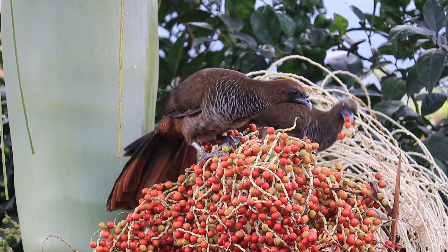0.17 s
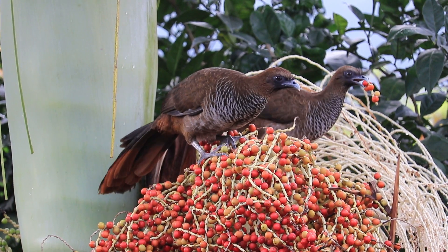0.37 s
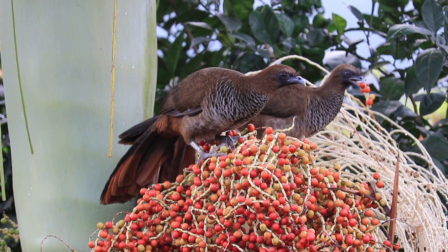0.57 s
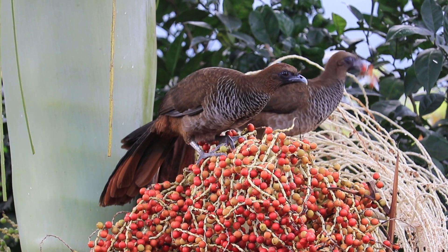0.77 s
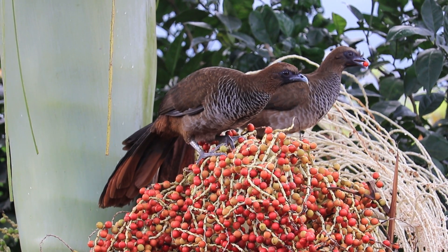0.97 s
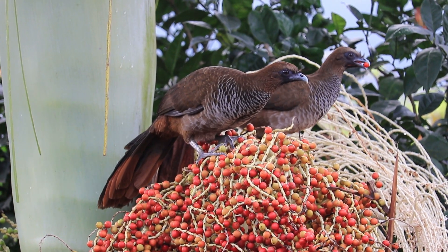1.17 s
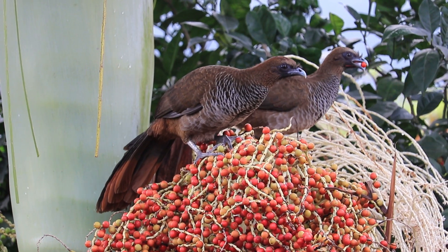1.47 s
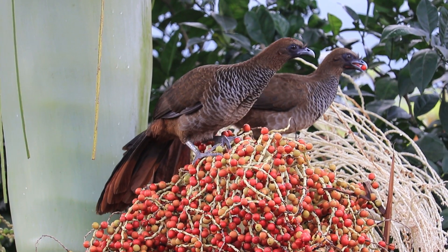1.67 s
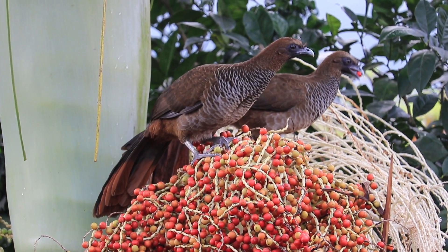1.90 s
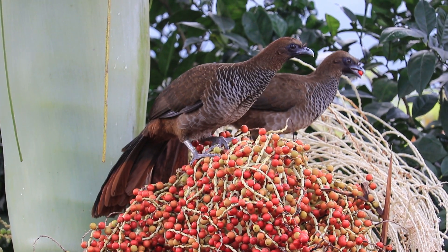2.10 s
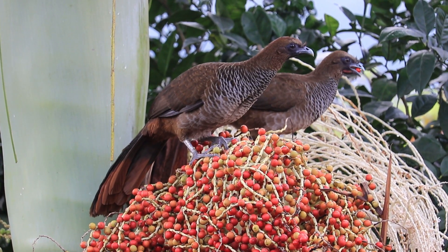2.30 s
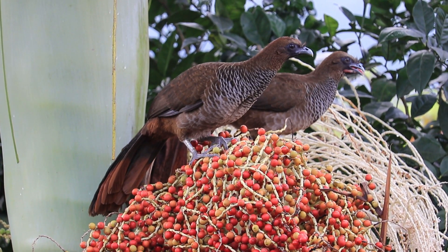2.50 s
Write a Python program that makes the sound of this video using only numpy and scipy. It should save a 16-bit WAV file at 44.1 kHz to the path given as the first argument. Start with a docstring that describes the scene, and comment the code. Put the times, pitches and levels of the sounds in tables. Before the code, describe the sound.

Two wild fowl squabble outdoors with harsh falling squeals and long whines, small birds peeping.

```python
"""A short peep, then the harsh falling squeal of a chachalaca squabbling on a palm's fruit cluster.
It squeals three times, twice breaking into a hoarse rasp; a rival answers with two long, clean whines.
Both voices are harmonic sources filtered by the throat, and turn rough where the pitch slips fast.
Small birds peep and twitter in gliding pure tones, the fruit stalks rustle in bursts of noise,
and the trees scatter an echo over a low outdoor rumble."""
import sys
import numpy as np
from scipy import signal
from scipy.fft import rfft, irfft, next_fast_len
from scipy.io import wavfile
from scipy.ndimage import map_coordinates

SR = 44100
rng = np.random.default_rng(int(sys.argv[2]) if len(sys.argv) > 2 else 0)


def bounce(signal):
    """Save signal as a 16-bit WAV file at the path given by the first command-line argument."""
    frames = np.transpose(np.atleast_2d(signal))
    limited = np.clip(frames, -1, 1)
    pcm = np.round(limited * 32767).astype(np.int16)
    wavfile.write(sys.argv[1], SR, pcm)


N = 116865

# Contour of each squeal: time_s, pitch_hz, level_db, overtone_gain_db
SQUEAL_CONTOURS = [
    [(.16, 1587, -47.5, -24), (.18, 2230, -27, -5.5), (.205, 2297, -29, 1.5), (.255, 2201, -23.5, -8),
     (.33, 2080, -29.5, 4), (.41, 1983, -24, -9.5), (.432, 1897, -31, -8), (.445, 1669, -23.5, -18),
     (.55, 1533, -46, -7)],
    [(.926, 1724, -34.5, -21), (.94, 2191, -26.5, -10.5), (.962, 2282, -33, 1.5), (.989, 2249, -37.5, 4),
     (.998, 2219, -18.5, -10), (1.04, 2135, -25.5, -2.5), (1.1, 2030, -25.5, -5), (1.145, 2005, -34, -11)],
    [(2.16, 1631, -38, -39), (2.185, 2190, -31, -5.5), (2.222, 2255, -37, 5.5), (2.25, 2219, -25, -3),
     (2.29, 2074, -32, 0.5), (2.335, 2030, -40.5, -2)],
]
# Overtones of a squeal: pitch_multiple, relative_db
SQUEAL_OVERTONES = [(2, -17), (3, 1.5), (3.5, -18), (4, 2.5), (5, -10)]
# Envelope of each hoarse tail: time_s, level_db
TAIL_ENVELOPES = [
    [(1.09, -42), (1.11, -28.5), (1.23, -33), (1.53, -39), (1.65, -49)],
    [(2.285, -48), (2.30, -24.5), (2.35, -33), (2.47, -33.5), (2.65, -36.5)],
]
# Noise spectrum of the tails: frequency_hz, relative_db
TAIL_SPECTRUM = [(1000, -15), (1330, -10.5), (1490, 1.5), (1850, 7.5), (2050, -7.5), (2350, -8.5),
                 (3500, -57), (5200, -39), (6200, -12), (8400, -21), (9500, -34)]
# Contour of each whine: time_s, pitch_hz, level_db, octave_gain_db
WHINE_CONTOURS = [
    [(.245, 1580, -39, -18), (.275, 1790, -22, -42), (.308, 1843, -14.5, -41), (.36, 1755, -24, -27),
     (.44, 1755, -23, -21.5), (.58, 1863, -20, -26.5), (.66, 1888, -26.5, -5.5), (.782, 1882, -25.5, -9.5),
     (.802, 1550, -45, 1)],
    [(1.645, 1574, -30.5, -15), (1.683, 1780, -25, -25), (1.71, 1794, -17, -34), (1.775, 1680, -35.5, -6),
     (1.815, 1693, -29.5, -23), (1.915, 1708, -37, -4), (2.0, 1746, -24, -18), (2.022, 1745, -39, -14),
     (2.04, 1766, -25, -12), (2.13, 1804, -23.5, -10.5), (2.203, 1836, -24, -10), (2.225, 1470, -44, 5.5)],
]
# Harmonics of a whine above the octave: pitch_multiple, relative_db
WHINE_HARMONICS = [(3, -17), (4, -18.5), (5, -20.5)]
# Small birds' slurred notes: start_s, length_s, first_hz, middle_hz, last_hz, level_db
PEEP_NOTES = [(.06, .09, 2580, 2480, 2130, -28), (2.125, .07, 2220, 2310, 2330, -37),
              (1.31, .11, 9350, 10100, 10500, -46), (1.75, .1, 9100, 10050, 10500, -45),
              (1.695, .042, 6400, 7200, 8200, -39), (1.782, .034, 3400, 4450, 5700, -29),
              (1.815, .015, 4400, 4200, 3750, -28), (.36, .21, 970, 880, 770, -45),
              (1.94, .26, 900, 865, 620, -45), (.735, .075, 1230, 1160, 1060, -44)]
# Flurries of squeaks: centre_s, spread_s, level_db
FLURRIES = [(1.68, .025, -45), (1.82, .022, -41)]
# Tiny, high, falling chips: start_s, level_db
HIGH_CHIPS = [(0.337, -38), (.718, -41), (1.85, -46)]
# Rustles of the fruit stalks: centre_s, width_s, level_db, centre_hz
STALK_RUSTLES = [(0.308, 0.031, -33.5, 1630), (0.553, 0.026, -36, 1980), (.78, 0.012, -37.5, 1824),
                 (1.36, 0.019, -40.5, 1696), (1.586, 0.014, -36, 1670), (1.831, 0.054, -34, 4040),
                 (2.37, 0.02, -36.5, 1770)]
# Reverberation time among the trees: frequency_hz, t60_s
TREE_DECAY = [(2000, 0.41), (6000, 0.46), (12000, 0.11)]
# Spectral density of rumble and leaf hiss: frequency_hz, relative_db
AIR_SPECTRUM = [(20, -7.5), (60, -0.5), (120, 0.5), (250, -7.5), (2000, -11), (4200, -14.5), (6200, -13),
                (8500, -14), (10000, -21), (15500, -24.5)]
# Likeness of that noise at left and right: frequency_hz, correlation
AIR_CORRELATION = [(90, .96), (400, .66), (12000, .72)]


def squeals(flutter_hz=380, shimmer_db=2.0, rasp_db=-27.5):
    """Amplitude modulation: a strained voice scoops up and sags, each overtone fluttering on its own."""
    out = np.zeros(N)
    for rows in SQUEAL_CONTOURS:
        gate, hz, db, overtone_db = contours(rows)
        phase = voice_phase(hz, jitter=.004, jitter_hz=flutter_hz)
        overtones = sum(amp(level + shimmer_db * wobble(flutter_hz)) * partial(phase, multiple, rasp_db)
                        for multiple, level in SQUEAL_OVERTONES)
        fundamental = partial(phase, 0.99, rasp_db)  # slightly flat
        out += gate * amp(db) * (fundamental + amp(overtone_db) * overtones)
    return throat(out)


def hoarse_tails(tone_hz=1534, jitter=0.0126, tone_db=-6, flutter_db=2.3):
    """Aperiodic voicing: a squeal breaks into fluttering band noise, a wavering tone at its low edge."""
    envelope = sum(gate * amp(db) for gate, db in map(contours, TAIL_ENVELOPES))
    tone = np.sqrt(2) * np.sin(phase_of(tone_hz * (1 + jitter * wobble(90))))
    flutter = unit_rms(amp(flutter_db * wobble(130)))
    rasp = noise(lambda hz: log_interp(TAIL_SPECTRUM, hz))
    return envelope * flutter * (rasp + amp(tone_db) * tone)


def whines(scratch_s=.17, scratch_db=6, wander_db=2.5, shimmer_db=1.5, rasp_db=-34):
    """Harmonic balance sets timbre: a rough onset clears to a near-pure tone that grows reedier."""
    out, t = np.zeros(N), np.arange(N) / SR
    for rows in WHINE_CONTOURS:
        gate, hz, db, octave_db = contours(rows)
        onset = np.exp(-((t - rows[0][0]) / scratch_s) ** 2)
        phase = voice_phase(hz, jitter=0.0019 + .012 * onset, jitter_hz=150)
        upper = np.zeros(N)
        for multiple, level in WHINE_HARMONICS:
            flicker_db = wander_db * wobble(24.68) + onset * scratch_db * wobble(130)
            upper += amp(level + flicker_db) * partial(phase, multiple, rasp_db)
        voice = partial(phase, 1, rasp_db) + amp(octave_db) * partial(phase, 2, rasp_db)
        voice += amp(.55 * (octave_db + 13)) * upper  # upper harmonics partly follow the octave
        out += gate * amp(db + shimmer_db * wobble(60)) * voice
    return throat(out)


def voice_phase(hz, jitter, jitter_hz, break_jitter=0.034, break_hz_per_s=7850):
    """Frequency modulation: a voice jitters, and turns rough wherever its pitch slips fast."""
    slip = np.clip(np.abs(np.gradient(hz)) * SR / break_hz_per_s, 0, 1) ** 2
    return phase_of(hz * (1 + jitter * wobble(jitter_hz) + break_jitter * slip * wobble(700)))


def partial(phase, multiple, rasp_db, rasp_hz=1300):
    """Sidebands: turbulence spreads a skirt of noise around one sinusoid."""
    sine, cosine = np.sin(multiple * phase), np.cos(multiple * phase)
    skirt = wobble(rasp_hz) * sine + wobble(rasp_hz) * cosine
    return np.sqrt(2) * (sine + amp(rasp_db) * skirt)


def throat(x, valley_hz=5050, width_hz=430, valley_db=-12, top_hz=9120):
    """Source and filter: the throat's response dips between resonances and drops above the top one."""
    valley = lambda hz: amp(valley_db * np.exp(-((hz - valley_hz) / width_hz) ** 2))
    shelf = lambda hz: 0.32 + 0.88 / (1 + (hz / top_hz) ** 48)
    return filtered(x, lambda hz: valley(hz) * shelf(hz))


def small_birds(chip_s=.014, chip_glide_hz=(15800, 13150, 10500)):
    """Superposition of pure-tone glides: single peeps, flurries and chips."""
    chips = sum(whistle(s, chip_s, chip_glide_hz, db) for s, db in HIGH_CHIPS)
    peeps = sum(whistle(s, length_s, glide_hz, db) for s, length_s, *glide_hz, db in PEEP_NOTES)
    return peeps + sum(twitter(*row) for row in FLURRIES) + chips


def twitter(centre_s, spread_s, db, pitch_hz=4700, spread_octaves=.38, squeak_s=.022):
    """Gaussian scatter: twelve squeaks of random time, pitch and slant make a flurry."""
    out = np.zeros(N)
    for when, pitch, slant in rng.standard_normal((12, 3)):
        hz = pitch_hz * 2 ** (spread_octaves * pitch)
        bend = np.exp(.13 * slant)
        out += whistle(centre_s + spread_s * when, squeak_s, (hz / bend, hz, hz * bend), db)
    return out


def whistle(start_s, length_s, glide_hz, db, jitter=.008):
    """Frequency sweep: a small bird's note swells and fades on a parabola through three pitches."""
    t = np.arange(int(length_s * SR)) / SR
    hz = np.polyval(np.polyfit([0, .5, 1], glide_hz, 2), t / length_s)
    hz *= 1 + jitter * np.interp(t * 400, np.arange(256), rng.standard_normal(256))
    envelope = amp(db) * np.sin(np.pi * t / length_s) ** 2
    tone = np.sqrt(2) * np.sin(phase_of(hz))
    return np.pad(envelope * tone, (int(start_s * SR), N))[:N]


def stalks(half_width_octaves=0.9, grain_db=4.6):
    """Modulated band noise: the fruit stalks rustle in soft, grainy bursts."""
    out, t = np.zeros(N), np.arange(N) / SR
    for centre_s, width_s, db, centre_hz in STALK_RUSTLES:
        band = noise(lambda hz: -10 * np.log10(1 + (np.log2((hz + 1) / centre_hz) / half_width_octaves) ** 8))
        envelope = amp(db) * np.exp(-.5 * ((t - centre_s) / width_s) ** 2)
        out += envelope * unit_rms(band * amp(grain_db * wobble(330)))
    return out


def among_trees(x, wet_db, width=0.31):
    """Reverberation: scattering adds a stereo echo whose highest frequencies die first."""
    hz, t, spectra = signal.stft(rng.standard_normal((2, SR // 2)), SR, nperseg=256)
    decay = amp(-60 * t / log_interp(TREE_DECAY, hz)[:, None])
    impulse = signal.istft(spectra * decay, SR, nperseg=256)[1]
    mid, side = signal.fftconvolve(x[None], impulse / np.linalg.norm(impulse[0]), axes=1)[:, :N]
    return x + amp(wet_db) * np.array([mid + width * side, mid - width * side])


def air(level_db=-39):
    """Partial coherence: distant rumble and leaf hiss, nearly mono in the bass."""
    def response(hz):
        angle = np.arccos(np.clip(log_interp(AIR_CORRELATION, hz), -1, 1)) / 2
        return amp(log_interp(AIR_SPECTRUM, hz)) * [np.cos(angle), np.sin(angle)]
    mid, side = filtered(rng.standard_normal((2, N)), response)
    return amp(level_db) * unit_rms(np.array([mid + side, mid - side]))


def amp(db):
    """Decibels to amplitude ratio."""
    return 10 ** (np.asarray(db) / 20)


def unit_rms(x):
    """Normalisation to unit power."""
    return x / np.sqrt(np.mean(x ** 2) + 1e-20)


def log_interp(points, hz):
    """Interpolation on a logarithmic frequency axis."""
    knots_hz, values = np.transpose(points)
    return np.interp(np.log(hz + 1), np.log(knots_hz + 1), values)


def contours(rows, fade_s=0.0055):
    """Linear interpolation: a soft gate over the rows' span, then each column at every sample."""
    times, *columns = np.transpose(rows)
    t = np.arange(N) / SR
    gate = np.clip(1 + np.minimum(t - times[0], times[-1] - t) / fade_s, 0, 1)
    return [gate] + [np.interp(t, times, column) for column in columns]


def wobble(rate_hz):
    """Smooth random modulation: a spline through rate_hz knots a second."""
    return map_coordinates(rng.standard_normal(N // 4), [np.arange(N) * rate_hz / SR + 2], mode="wrap")


def filtered(x, response):
    """Linear filtering: the spectrum times a frequency response."""
    size = next_fast_len(N + SR // 4)
    return irfft(rfft(x, size) * response(np.fft.rfftfreq(size, 1 / SR)), size)[..., :N]


def noise(spectrum_db):
    """Spectral shaping of white noise, at unit power."""
    return unit_rms(filtered(rng.standard_normal(N), lambda hz: amp(spectrum_db(hz))))


def phase_of(hz):
    """Phase is the integral of frequency."""
    return 2 * np.pi * np.cumsum(hz) / SR


def scene(balance_db=0.51):
    """Superposition: birds and stalks among the trees, slightly to the left, over the open air."""
    squealer = among_trees(squeals() + hoarse_tails(), wet_db=-4)
    rival = among_trees(whines(), wet_db=-16)
    around = among_trees(small_birds() + stalks(), wet_db=-6)
    return (squealer + rival + around) * amp([[balance_db], [-balance_db]]) + air()


def record(dry, top_hz=15850):
    """Band limiting: an ideal low-pass filter removes the highest treble."""
    return filtered(dry, lambda hz: hz < top_hz)


dry = scene()
out = record(dry)
bounce(out)
```